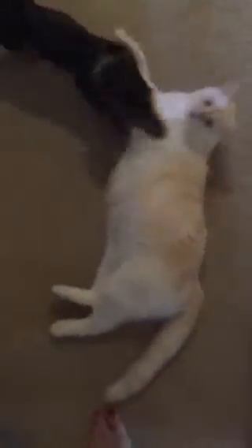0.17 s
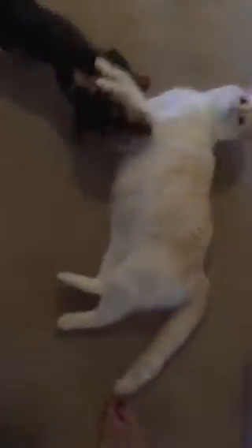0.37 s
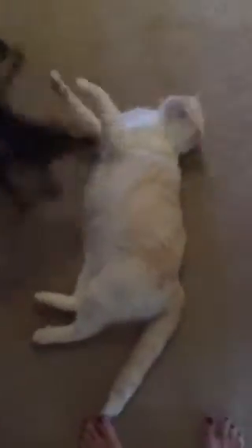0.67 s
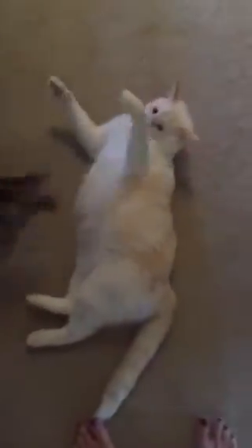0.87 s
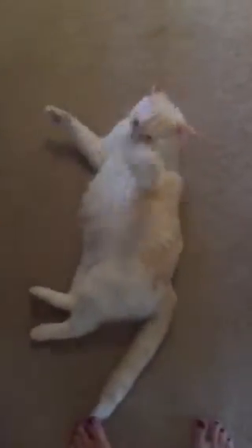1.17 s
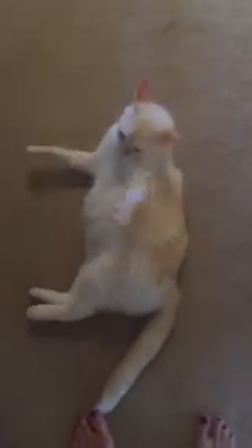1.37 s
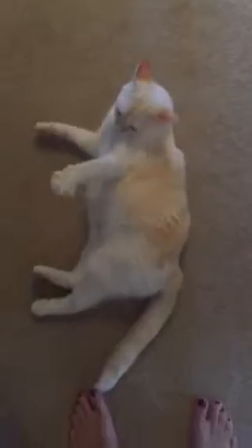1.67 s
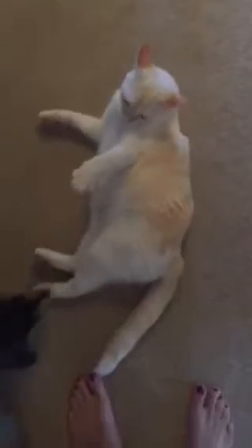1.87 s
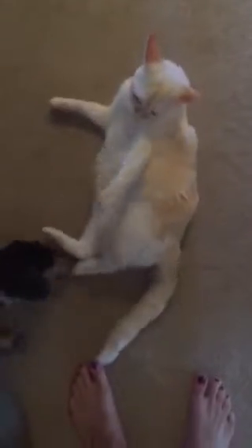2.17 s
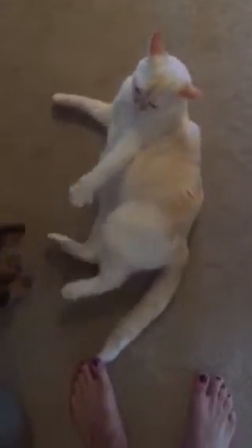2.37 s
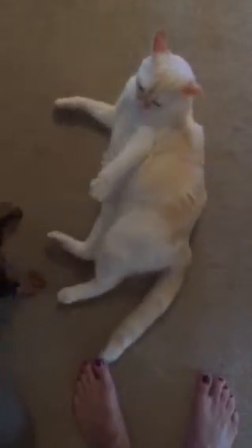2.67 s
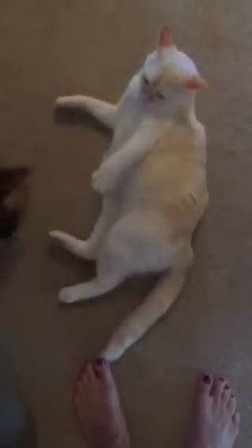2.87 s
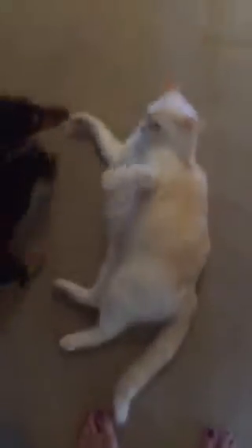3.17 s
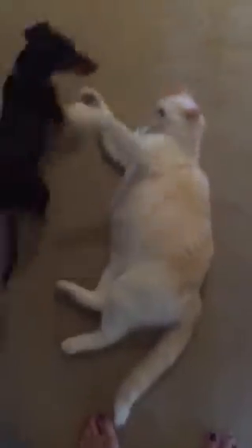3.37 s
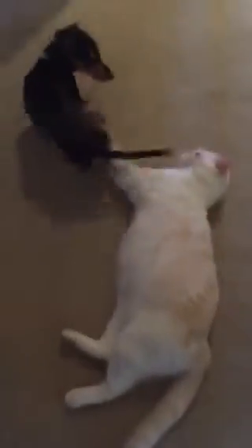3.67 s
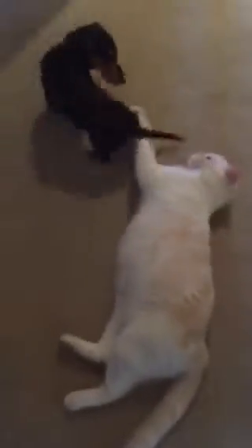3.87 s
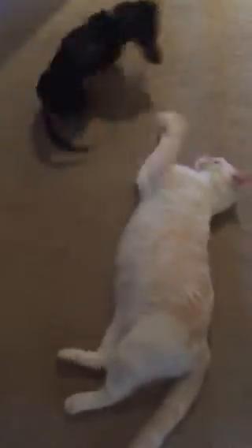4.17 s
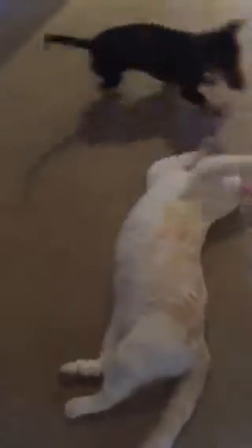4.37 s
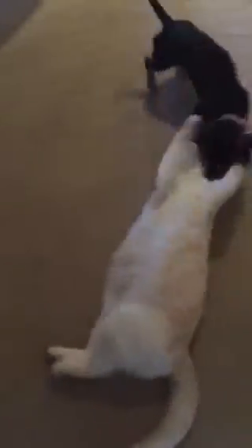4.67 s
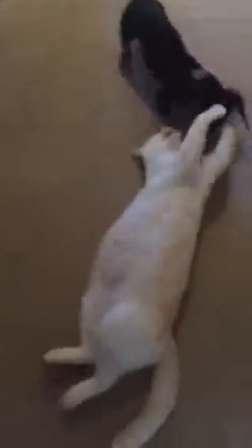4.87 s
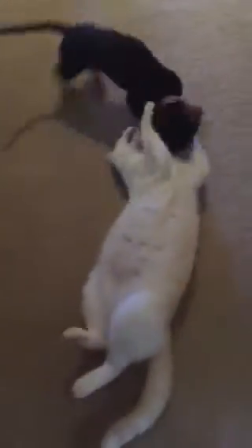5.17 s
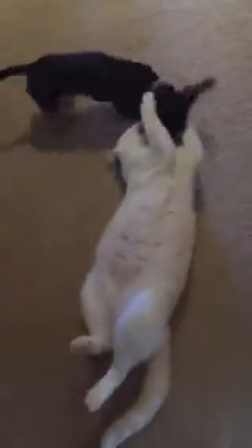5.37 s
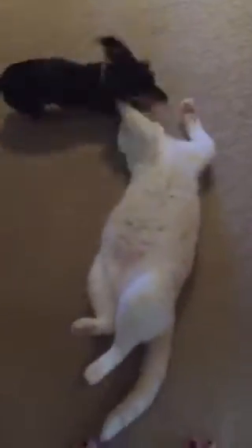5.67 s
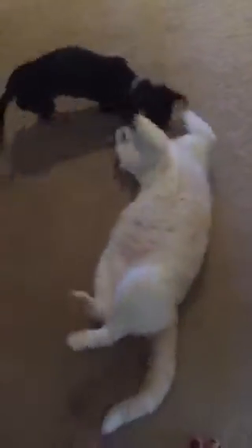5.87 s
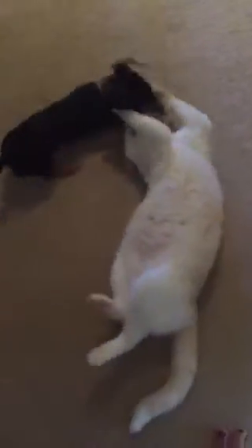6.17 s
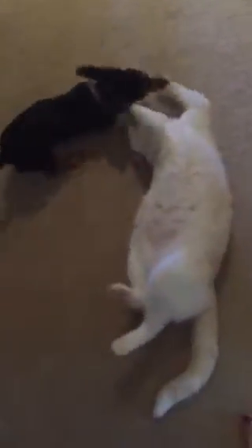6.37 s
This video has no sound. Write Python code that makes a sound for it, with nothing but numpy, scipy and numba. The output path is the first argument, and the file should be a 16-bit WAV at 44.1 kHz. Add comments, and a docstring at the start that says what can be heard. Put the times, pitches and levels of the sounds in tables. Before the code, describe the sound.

A small dog's collar bell and metal tags jingle in quick bursts, with soft paw thumps and carpet scuffs in a humming room.

```python
"""Close to the microphone, on a carpet indoors, a small dog romps around a cat; the room hums throughout.
From the start a pellet rings the collar bell's close pair of tones, and buckle and tag soon chatter above it.
After a first busy spell the collar grows quiet a little past 2 s, then shakes again, hardest past 4 s.
Paws thump the floor boards and scuff the pile from the first second until near the end.
Metal and paws are decaying modes pushed by timed blows; cracks, scuffs and hum are shaped noise."""
import sys
import numpy as np
from scipy import signal
from scipy.fft import rfft, irfft, next_fast_len
from scipy.io import wavfile
from scipy.ndimage import uniform_filter1d
from numba import njit

SR = 44100
rng = np.random.default_rng(int(sys.argv[2]) if len(sys.argv) > 2 else 0)


def master(y):
    """Save y as 16-bit WAV."""
    cut = np.clip(np.atleast_2d(y).T, -1, 1)
    pcm = np.round(cut * 32767)  # scale
    wavfile.write(sys.argv[1], SR, pcm.astype(np.int16))


N = 287532  # samples
BLOCK = 256  # samples over which a mode holds its pitch
LN_60_DB = np.log(1000)  # a fall of 60 dB, as an exponent


def amp(db):
    """Turns decibels into an amplitude factor."""
    return 10 ** (np.asarray(db) / 20)


def unit_rms(x):
    """Scales a signal to rms 1."""
    return x / np.sqrt(np.mean(x ** 2) + 1e-20)


def slow_drift(blocks):
    """Random wander with one value per block, smoothed over the given number of blocks, rms 1."""
    return unit_rms(uniform_filter1d(rng.standard_normal(N // BLOCK + 1), size=blocks))


def patchy(depth_db, frames, bins):
    """Noise whose colour changes in random patches of time and pitch, so that no two contacts sound alike."""
    real, imag, patches = rng.standard_normal((N // 128 + 5, 129, 3)).T
    patches = uniform_filter1d(patches, bins, 0)
    patches = unit_rms(uniform_filter1d(patches, frames, 1))
    spectrum = (real + 1j * imag) * amp(depth_db * patches)
    return unit_rms(signal.istft(spectrum, nperseg=256, noverlap=128)[1][:N])


def gritty():
    """Patchy noise that also sputters from one millisecond to the next."""
    sputter = unit_rms(uniform_filter1d(rng.standard_normal(N), size=40))
    return unit_rms(amp(3.7 * sputter) * patchy(5.0, frames=4, bins=5))


def coloured(points, source):
    """Filters noise along the given spectrum, interpolated over log frequency, to rms 1."""
    pitch_hz, level_db = np.transpose(points)
    size = next_fast_len(N)
    bins_hz = np.fft.rfftfreq(size, 1 / SR)
    gain_db = np.interp(np.log(bins_hz + 1), np.log(pitch_hz + 1), level_db)
    return unit_rms(irfft(rfft(source, size) * amp(gain_db), size)[:N])


def train(start_s, size):
    """One impulse of the given size at each time."""
    out = np.zeros(N, complex)
    np.add.at(out, np.clip((start_s * SR).astype(int), 0, N - 1), size)
    return out


@njit
def sway(blows, turn, fall, rise):
    """One mode: a rotating, fading state that each blow pushes softly, through two smoothing stages."""
    out, a, b, c = np.zeros(len(blows)), 0j, 0j, 0j
    for i in range(len(blows)):
        step = turn[i // 256]
        a = rise * step * a + (1 - rise) * blows[i] + 1e-18
        b = rise * step * b + (1 - rise) * a
        c = fall * step * c + b
        out[i] = c.real
    return out


def ring(start_s, level_db, modes, spread_db, rise_s, waver, muffle=0):
    """Blows land on varied spots, so mode shares and phases vary; touching parts bend the pitch, fur damps it."""
    pressed = muffle * np.maximum(slow_drift(9), 0)  # fur on the metal, now and then
    chance = rng.random((len(start_s), len(modes), 2))
    out = np.zeros(N)
    for k, (pitch_hz, mode_db, t60_s) in enumerate(modes):
        share_db = spread_db * (2 * chance[:, k, 0] - 1.5)
        phase = np.exp(2j * np.pi * chance[:, k, 1])
        blows = train(start_s, amp(level_db + mode_db + share_db) * phase)
        decay = LN_60_DB / (t60_s * SR)
        bent_hz = pitch_hz * (1 + waver * slow_drift(4))
        turn = np.exp(2j * np.pi * bent_hz / SR - pressed * decay)
        out += sway(blows, turn, np.exp(-decay), np.exp(-1 / (rise_s * SR)))
    return out


def crack(grit, start_s, level_db, low_hz, high_hz, over_db, t60_s):
    """A band of grainy noise after each blow: a sharp snap, then a short fizz."""
    blows = train(start_s, amp(level_db + over_db) ** 2).real + 1e-20
    fizz, snap = [signal.lfilter([1], [1, -np.exp(-2 * LN_60_DB / (t * SR))], blows) for t in (t60_s, .007)]
    power = uniform_filter1d(fizz + amp(-6.0) * snap, size=60)  # contact lasts about a millisecond
    band = signal.butter(3, [low_hz, min(high_hz, .45 * SR)], "bandpass", fs=SR, output="sos")
    return signal.sosfilt(band, np.sqrt(abs(power)) * grit) * np.sqrt(SR / 2 / (high_hz - low_hz))


def grains(start_s, within_s, weaker_db, count=5):
    """Times and dB losses of each blow and its faint random grains, from 4 ms before it; the later,
    the fainter on average."""
    late, weak = np.moveaxis(rng.random((len(start_s), count, 2)), 2, 0)
    times = np.c_[start_s, start_s[:, None] - .004 + within_s * late ** 2]
    loss_db = np.c_[0 * start_s, weaker_db + 8.0 * weak + 9.0 * late ** 2]
    return times.ravel(), loss_db


def with_loss(level_db, loss_db):
    """Levels of all blows and their faint grains, in the order of the list of times."""
    return (level_db[:, None] - loss_db).ravel()


# how hard the collar is shaken, as the level of its small touches: start_s, level_db
SHAKING = [(0.0, -77), (0.45, -66.5), (0.6, -52), (0.93, -53), (1.96, -58.5), (2.07, -86), (2.36, -75.5),
           (2.91, -58), (3.78, -51.5), (4.05, -64), (4.18, -41.5), (4.54, -42.5), (5.3, -50.5),
           (5.48, -67.5), (5.74, -41), (5.85, -45), (6.15, -53), (6.52, -47.5)]
TOUCH_SPREAD_DB = 12


def touches(over_db, count):
    """Small chance contacts between the clear ones, following the shaking; each excites two parts unevenly."""
    where, first, second = rng.random((count, 3)).T
    start_s = (np.arange(count) + where) * N / SR / count
    level_db = np.interp(start_s, *np.transpose(SHAKING)) + over_db
    return np.c_[start_s, level_db - TOUCH_SPREAD_DB * first, level_db - TOUCH_SPREAD_DB * second]


HUM_DB = -64  # rms level
# spectrum of the room's hum: pitch_hz, level_db (relative, per Hz)
HUM = [(28, -8), (50, 1.5), (80, -2.5), (187, -14.5), (300, -20), (420, -24), (1060, -28.5), (4670, -30.5),
       (16000, -48)]


def room_hum():
    """The indoor background: steady noise, strongest in the bass, with slight drifts of colour."""
    return amp(HUM_DB) * coloured(HUM, patchy(1.5, frames=30, bins=2))


def room_reflections(near, t60_s=0.13):
    """Sparse reflections of random sign, damped by soft furnishings."""
    at = np.arange(250, 14000, 20)  # samples of delay
    taps = np.zeros(14100)
    places = at + rng.integers(0, 20, len(at))
    taps[places] = rng.choice([-1., 1.], len(at)) * amp(-60 * at / SR / t60_s)
    return signal.oaconvolve(near, taps / np.linalg.norm(taps))[:N]


# paws and fur dragging on the carpet: middle_s, length_s, level_db (at the middle)
SCUFFS = [(0.39, 0.19, -68.5), (0.69, 0.21, -59), (4.035, 0.19, -59.5), (5.318, 0.12, -62.5),
          (5.955, 0.68, -67.5)]
SCUFF_ENDS_DB = -14.5  # each drag swells to its middle and fades again
# spectrum of the rubbed pile: pitch_hz, level_db (relative, per Hz)
PILE = [(200, -3), (500, 0), (1200, -3), (2500, -6), (4500, -11), (7000, -35)]


def carpet():
    """Uneven hiss of the pile under each drag."""
    t = np.arange(N) / SR
    level = sum(amp(db + SCUFF_ENDS_DB * abs(2 * (t - middle_s) / length_s)) for middle_s, length_s, db in SCUFFS)
    return level * coloured(PILE, patchy(4.5, frames=4, bins=4))


# paws landing: start_s, boom_db, pat_db
PAWS = [(0.534, -52.5, -69), (0.821, -49.5, -57), (1.091, -41, -49), (1.137, -54, -77), (1.358, -41, -50),
        (1.694, -51, -59), (2.891, -49, -80), (3.197, -51, -60), (3.272, -40.5, -55), (3.443, -47, -74),
        (3.517, -45.5, -73), (3.55, -53, -77), (3.604, -50, -60.5), (3.753, -48.5, -79), (3.95, -47.5, -56),
        (3.991, -52, -65), (4.065, -57, -46.5), (4.271, -41, -41), (4.309, -46, -55.5), (4.398, -44, -57.5),
        (4.48, -44.5, -47), (4.591, -44.5, -66), (4.629, -43.5, -68), (4.676, -47, -48.5),
        (4.717, -61, -51), (5.196, -55, -52), (5.578, -52, -78), (6.057, -39.5, -78), (6.109, -56, -80)]
# modes of the floor boards: pitch_hz, level_db (added to boom_db), t60_s
BOARDS = [(55.3, -9, 0.64), (82, 2, 0.19), (120.2, -3, 0.14), (162, -9.5, 0.12)]
# modes of the paw's pat on the pile: pitch_hz, level_db (added to pat_db), t60_s
PADS = [(267.4, -4, 0.098), (393, -8, 0.06), (593, -11, 0.036)]


def paws():
    """Soft landings: a pat on the pile, then the floor boards boom briefly."""
    start_s, boom_db, pat_db = np.transpose(PAWS)
    boom = ring(start_s, boom_db, BOARDS, spread_db=2.0, rise_s=0.00058, waver=0.083)
    pat = ring(start_s - .006, pat_db, PADS, spread_db=7.0, rise_s=0.00084, waver=0.066)
    return boom + pat


# the fittings clink: start_s, buckle_db, tag_db
CHATTER = [(0.022, -43.5, -50), (0.393, -44, -47), (0.427, -48, -44), (0.486, -42.5, -53),
           (0.645, -41, -36), (0.734, -29.5, -41), (0.745, -36, -28), (0.84, -40, -35.5), (0.869, -35, -46),
           (0.888, -32, -40), (0.971, -18.5, -28), (0.997, -33, -43), (1.014, -39, -26.5),
           (1.029, -26, -37), (1.108, -37, -41), (1.174, -37.5, -31), (1.193, -26, -28.5),
           (1.235, -35, -36), (1.275, -41, -38), (1.347, -41.5, -48), (1.52, -38, -36), (1.779, -47.5, -44),
           (1.906, -24, -29.5), (2.057, -42.5, -45.5), (2.461, -40, -42), (2.577, -40, -41.5),
           (2.718, -38.5, -51), (2.766, -37, -42), (2.81, -34.5, -38), (2.835, -48, -50), (2.851, -33, -51),
           (2.892, -35, -41), (2.954, -55, -40), (3.031, -40, -37), (3.175, -50, -56), (3.234, -30, -34),
           (3.363, -45, -39), (3.378, -29, -29.5), (3.504, -41, -42), (3.538, -29, -32), (3.57, -37, -35.5),
           (3.923, -42.5, -53), (4.049, -35, -30), (4.092, -38, -40), (4.164, -41, -42),
           (4.178, -35, -38.5), (4.224, -37, -45), (4.252, -36, -41), (4.281, -25.5, -34),
           (4.333, -41, -54), (4.388, -35, -41), (4.433, -18.5, -23.5), (4.466, -31.5, -37),
           (4.55, -17.5, -33), (4.63, -32, -38), (4.679, -25, -31), (4.687, -28, -22), (4.887, -35.5, -62),
           (4.912, -31, -44), (4.935, -26, -21.5), (4.967, -31.5, -61), (5.018, -46, -38.5),
           (5.07, -36.5, -46), (5.087, -33, -31.5), (5.153, -32, -36), (5.273, -34, -36), (5.317, -38, -42),
           (5.38, -55, -49), (5.446, -43, -40), (5.454, -26, -31), (5.488, -37.5, -40), (5.66, -52, -43),
           (5.732, -26.5, -30.5), (5.804, -28, -33), (5.954, -39, -37), (5.966, -31, -35),
           (6.019, -44, -51), (6.218, -34, -37.5), (6.263, -37.5, -46), (6.353, -29, -30),
           (6.364, -21.5, -35), (6.379, -24.5, -48), (6.395, -24.5, -30)]
# fittings knock hard on the strap: start_s, level_db
KNOCKS = [(0.4247, -50), (0.5912, -48), (0.8867, -42), (0.9707, -61), (1.0156, -42), (1.275, -48),
          (1.5188, -44), (1.7784, -66), (1.9071, -46.5), (2.4623, -52), (3.234, -50.5), (3.3632, -48.5),
          (3.5374, -54), (4.2802, -62), (4.4642, -45.5), (4.5486, -36.5), (4.695, -34.5), (4.886, -48),
          (4.912, -46), (4.9342, -34), (5.085, -51), (5.2734, -48.5), (5.731, -40), (5.964, -39.5),
          (6.116, -55), (6.392, -49.5)]
KNOCK_UNDER_DB = 26.5  # every clink also knocks faintly, this far under the buckle
# modes of the buckle: pitch_hz, level_db (added to buckle_db), t60_s
BUCKLE = [(7490, -30.5, 0.13), (8640, -1.5, 0.0084), (9400, -38, 0.035), (9410, -10.5, 0.05),
          (10290, -6, 0.027), (10200, -14, 0.035)]
# modes of the tag: pitch_hz, level_db (added to tag_db), t60_s
TAG = [(11880, -7, .06), (11960, -7, .08), (12110, -9, .08), (12840, -11, .07), (13300, -11, .05),
       (13720, -14, .05), (15000, -12, .04)]
# noise of each contact, here and in the bell: low_hz, high_hz (capped in crack), over_db (over its blow), t60_s
# rows: pellet hiss, pellet snap, buckle, tag, strap, pellet's dull tap
CRACKS = [(6100, 15800, -13, 0.068), (5230, 6224, 1.5, 0.015), (6770, 10730, -5.5, 0.024),
          (11200, 14000, -6.5, 0.035), (1830, 23700, 0, 0.073), (3630, 5030, -15.5, 0.023)]


def fittings():
    """Buckle and tag chatter against each other and knock on the strap, each with its ring or crack."""
    start_s, *levels = np.r_[CHATTER, touches(over_db=1.5, count=170)].T
    times, loss_db = grains(start_s, within_s=.07, weaker_db=14.5)
    buckle_db, tag_db = (with_loss(db, loss_db) for db in levels)
    buckle = ring(times, buckle_db, BUCKLE, spread_db=9.0, rise_s=.00015, waver=.015)
    tag = ring(times, tag_db, TAG, spread_db=9.0, rise_s=.0002, waver=.005, muffle=.8)
    grit = gritty()
    buckle += crack(grit, times, buckle_db, *CRACKS[2])
    tag += crack(grit, times, tag_db, *CRACKS[3])
    knock_s, knock_db = np.transpose(KNOCKS)
    knock_times, knock_loss_db = grains(knock_s, within_s=0.036, weaker_db=10.5)
    strap_s = np.r_[times, knock_times]
    strap_db = np.r_[buckle_db - KNOCK_UNDER_DB, with_loss(knock_db, knock_loss_db)]
    return buckle + tag + crack(grit, strap_s, strap_db, *CRACKS[4])


# the pellet strikes the bell: start_s, tone_db, tick_db
STRIKES = [(0, -36, -48.5), (0.22, -56, -61), (0.436, -53, -40.5), (0.464, -43.5, -46), (0.579, -49, -50),
           (0.636, -36, -33), (0.696, -44, -47), (0.758, -41.5, -37), (0.828, -33, -44),
           (0.895, -31.5, -34), (0.95, -33, -31), (0.97, -32.5, -37), (1.005, -23, -26),
           (1.136, -42.5, -49), (1.182, -39, -41), (1.196, -42, -36), (1.257, -35.5, -42),
           (1.349, -39, -50), (1.384, -37, -44), (1.432, -32.5, -45), (1.517, -68, -42),
           (1.548, -30, -25.5), (1.654, -46, -58), (1.745, -39, -49), (1.794, -42.5, -36.5),
           (1.983, -44.5, -49.5), (2.04, -44.5, -61), (2.328, -55.5, -64), (2.413, -63, -56),
           (2.462, -58.5, -46.5), (2.501, -57, -45), (2.572, -48, -50), (2.662, -48.5, -50),
           (2.719, -42, -56), (2.749, -56, -47), (2.786, -35, -40), (2.815, -57, -33.5), (2.851, -45, -31),
           (2.885, -43, -35), (2.942, -37, -43), (2.957, -38.5, -44), (2.981, -50, -42),
           (3.037, -39.5, -40), (3.05, -39, -40.5), (3.12, -33.5, -39), (3.175, -48, -44),
           (3.377, -32.5, -36.5), (3.505, -34.5, -48), (3.54, -39, -35.5), (3.728, -30, -41),
           (3.76, -34.5, -39), (3.812, -42, -47), (3.963, -35.5, -42), (4.022, -43.5, -41),
           (4.078, -38.5, -43), (4.164, -32, -45), (4.223, -32, -36), (4.323, -44, -39), (4.38, -30, -51),
           (4.39, -34, -41), (4.495, -37, -33.5), (4.549, -52, -29), (4.619, -39.5, -40),
           (4.664, -41, -33.5), (4.697, -45, -27.5), (4.713, -24, -45), (4.746, -32.5, -32),
           (4.809, -41.5, -44), (4.913, -32.5, -36), (5.012, -35.5, -47), (5.036, -45, -45),
           (5.084, -28, -47), (5.151, -37, -47), (5.232, -41, -42), (5.276, -33, -41),
           (5.406, -34.5, -39.5), (5.45, -37, -39), (5.523, -45.5, -43), (5.659, -34.5, -55),
           (5.732, -47, -33), (5.801, -32.5, -45), (5.836, -36.5, -37.5), (5.866, -42, -39.5),
           (6.112, -43, -36.5), (6.177, -48.5, -48), (6.277, -46, -43.5), (6.352, -46, -32.5),
           (6.487, -42, -47)]
# modes of the bell's shell: pitch_hz, level_db (added to tone_db), t60_s
BELL = [(5153, -4, .13), (5305, 0, .15), (5420, -8, .07)]
# modes of the pellet's tick: pitch_hz, level_db (added to tick_db), t60_s
PELLET = [(5760, -11, .04), (6030, -10, .05), (6330, -11, .04), (6920, -14, .05)]


def bell():
    """The pellet ticks against the shell, whose close pair of tones swells and beats."""
    start_s, *levels = np.r_[STRIKES, touches(over_db=3, count=170)].T
    times, loss_db = grains(start_s, within_s=.06, weaker_db=8.0)
    tone_db, tick_db = (with_loss(db, loss_db) for db in levels)
    tone = ring(times, tone_db, BELL, spread_db=4.0, rise_s=.0006, waver=.0045, muffle=1.3)
    tick = ring(times, tick_db, PELLET, spread_db=3.5, rise_s=0.00044, waver=0.0024)
    grit = gritty()
    contact = sum(crack(grit, times, tick_db, *CRACKS[k]) for k in [0, 1, 5])  # hiss, snap, dull tap
    return tone + tick + contact


def scene():
    """Collar and paws close by with their reflections, over the carpet's scuffs and the hum."""
    near = paws() + fittings() + bell()
    return (room_hum() + carpet() + near + amp(-10.0) * room_reflections(near))[None]


def record(dry):
    """The small microphone loses the deep bass; then a low-pass sets the upper band limit."""
    thin = signal.sosfilt(signal.butter(3, 42., "highpass", fs=SR, output="sos"), dry)
    band_limit = signal.firwin(301, 15880, window=("kaiser", 7), fs=SR)  # edge in Hz
    return signal.oaconvolve(thin, band_limit[None], "same")


dry = scene()
out = record(dry)
master(out)
```